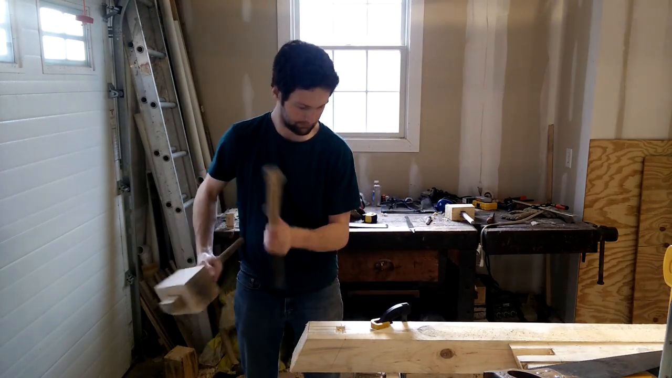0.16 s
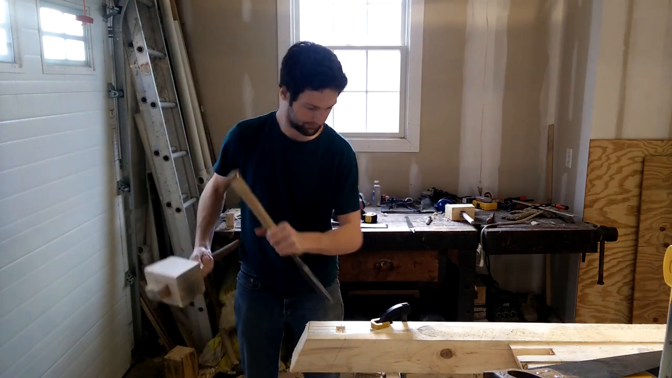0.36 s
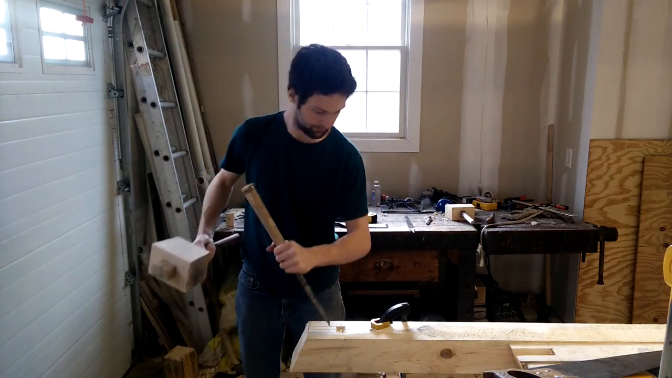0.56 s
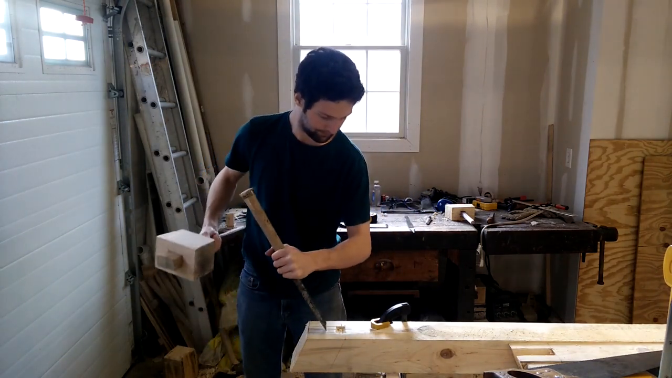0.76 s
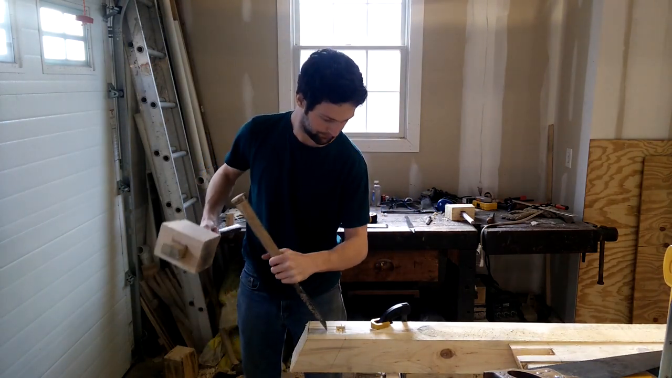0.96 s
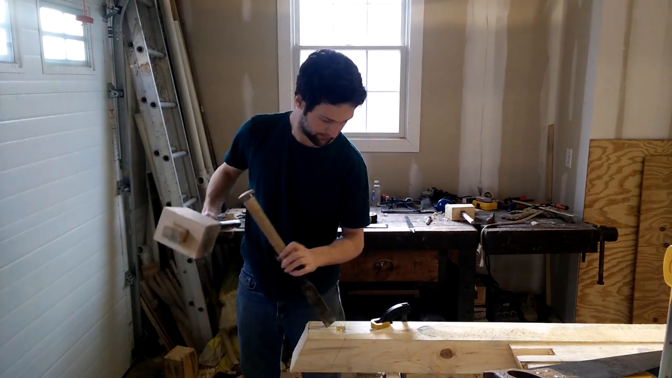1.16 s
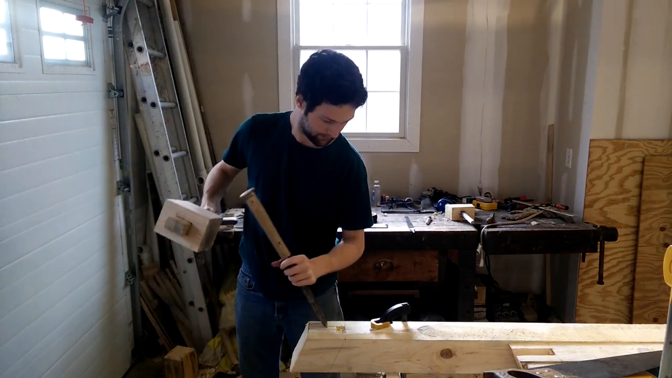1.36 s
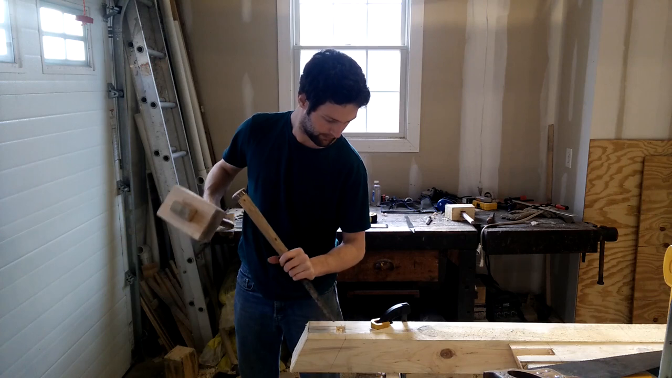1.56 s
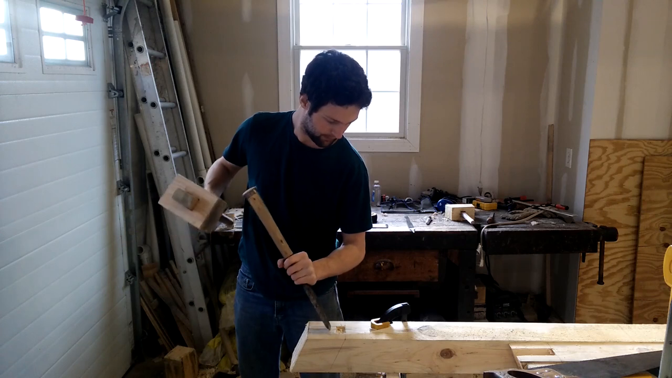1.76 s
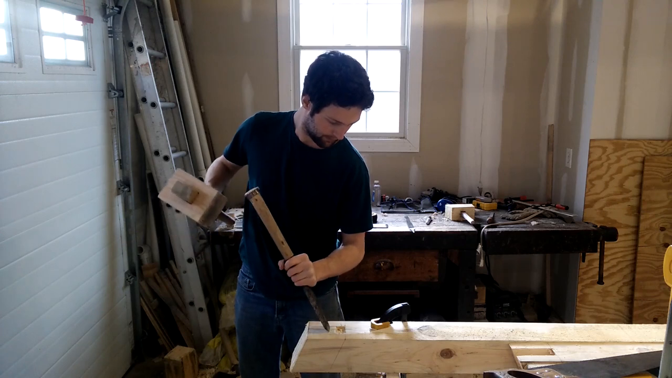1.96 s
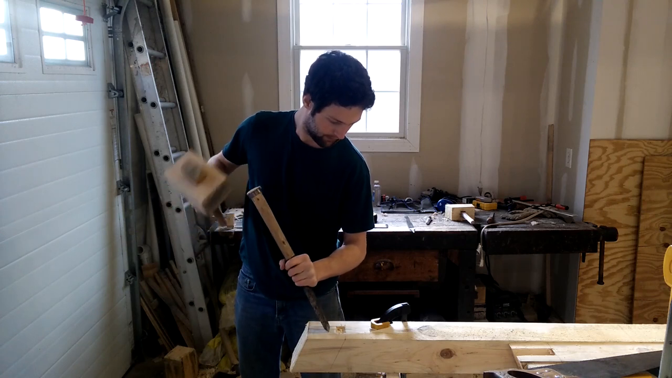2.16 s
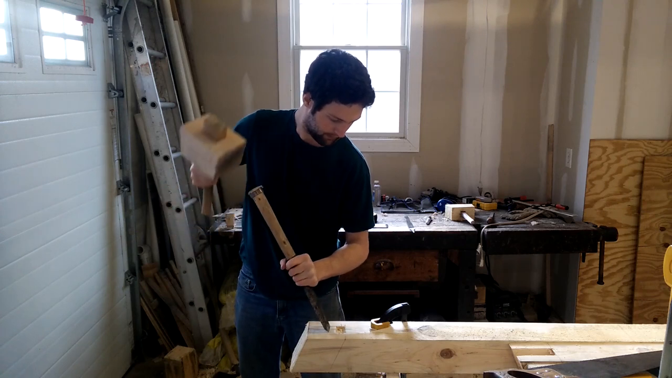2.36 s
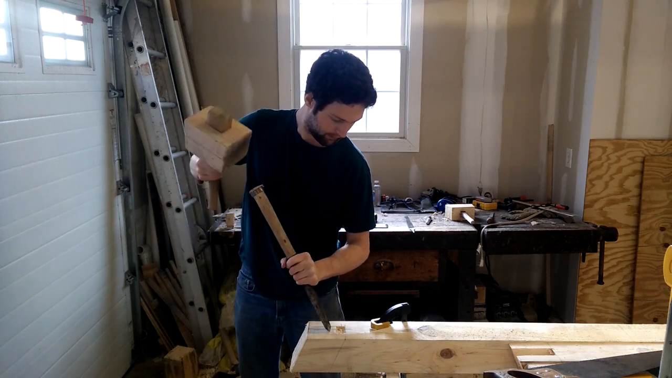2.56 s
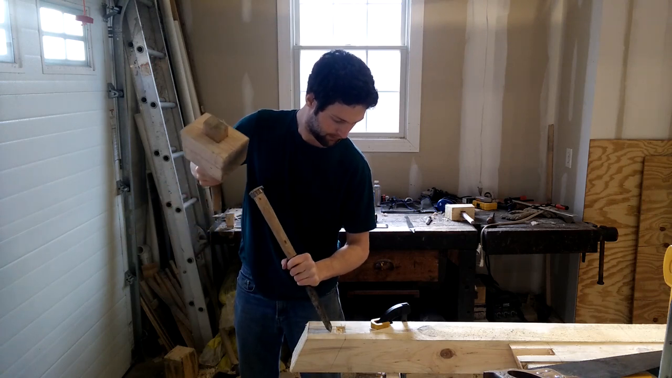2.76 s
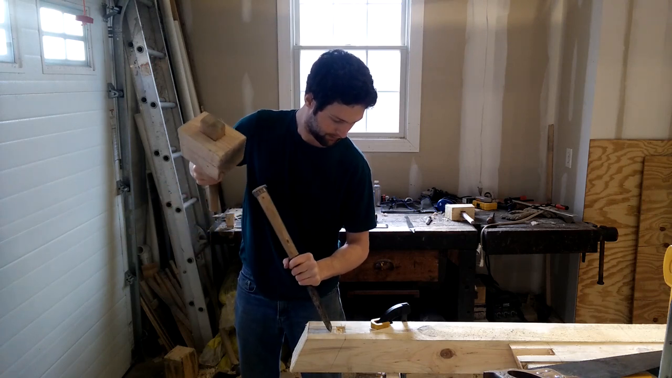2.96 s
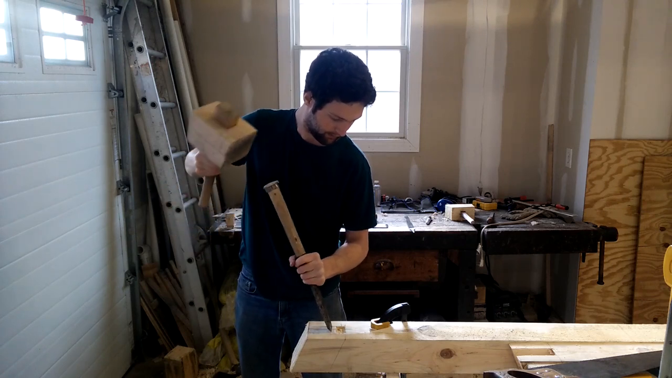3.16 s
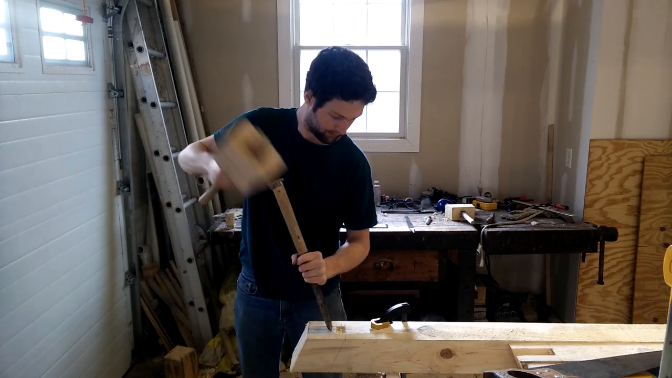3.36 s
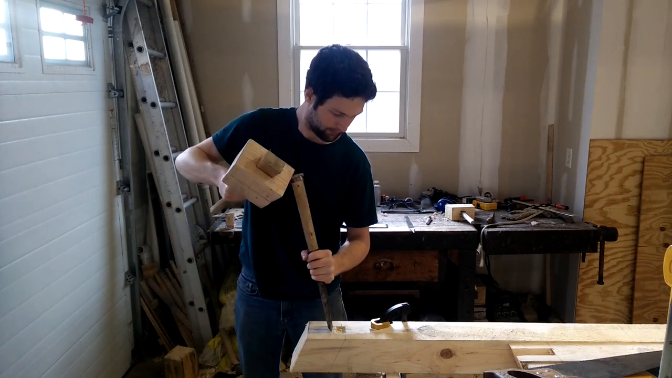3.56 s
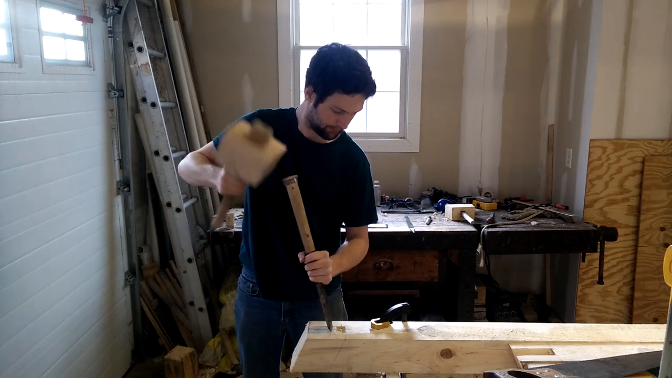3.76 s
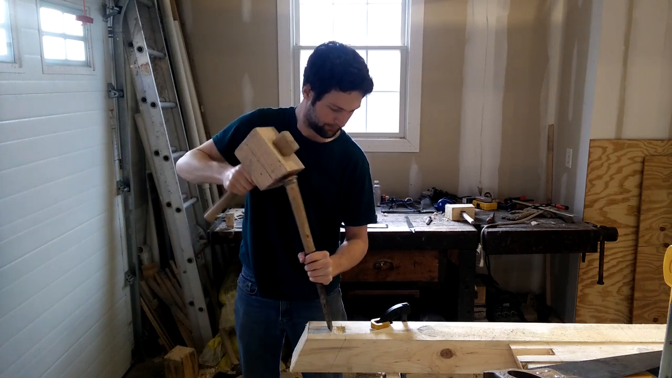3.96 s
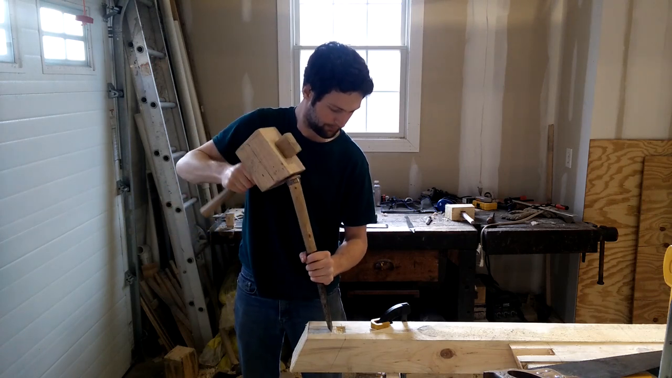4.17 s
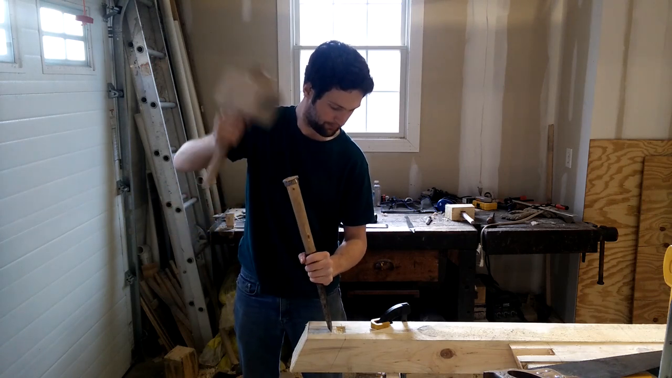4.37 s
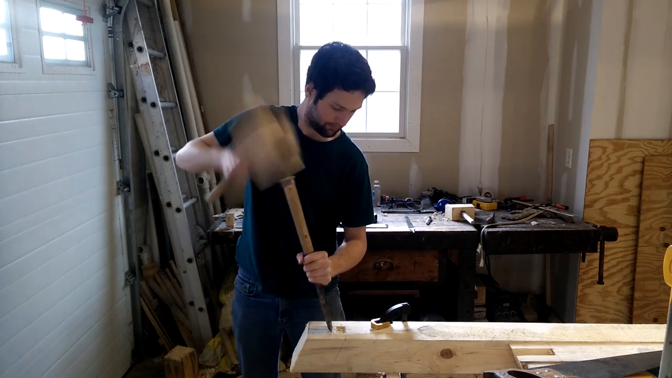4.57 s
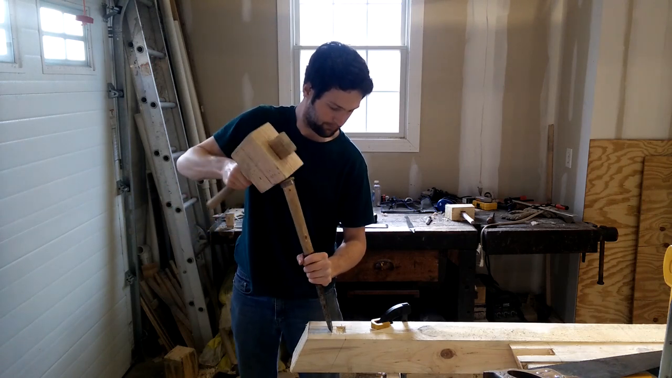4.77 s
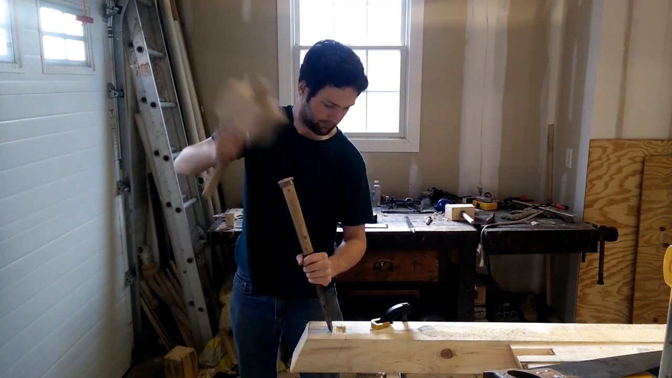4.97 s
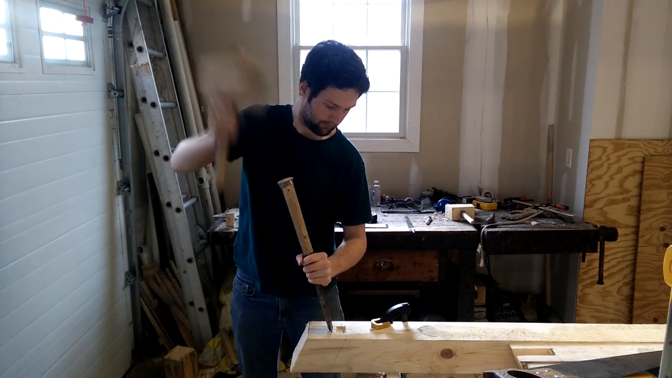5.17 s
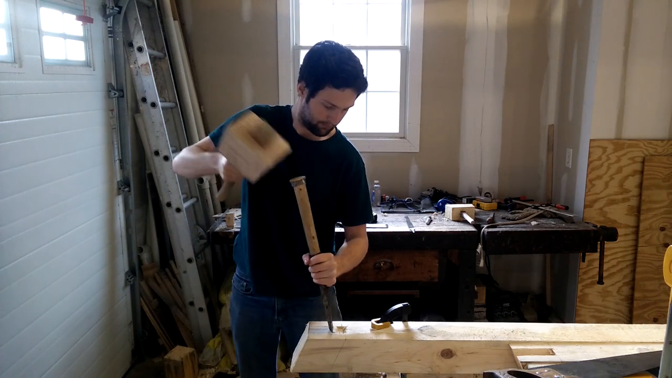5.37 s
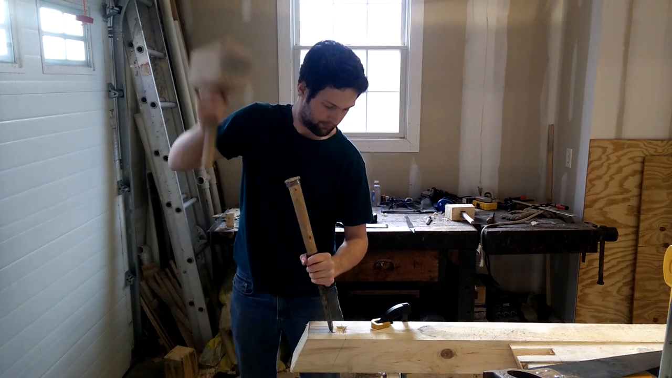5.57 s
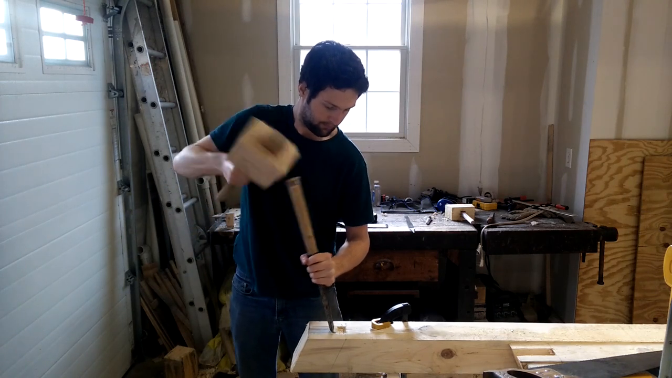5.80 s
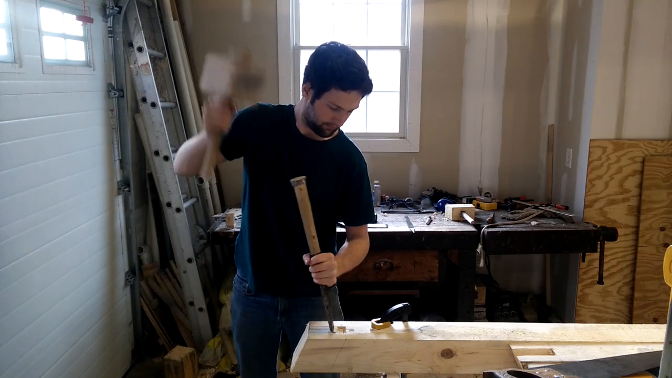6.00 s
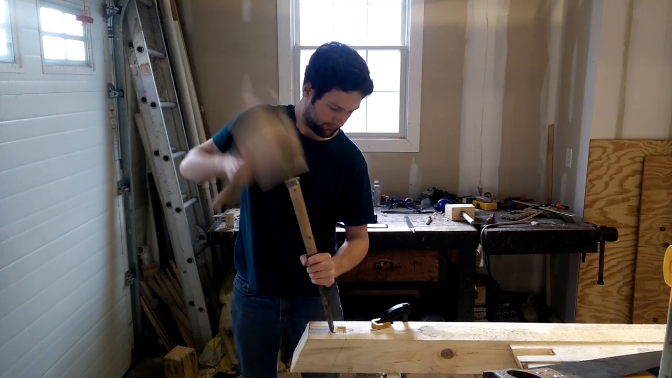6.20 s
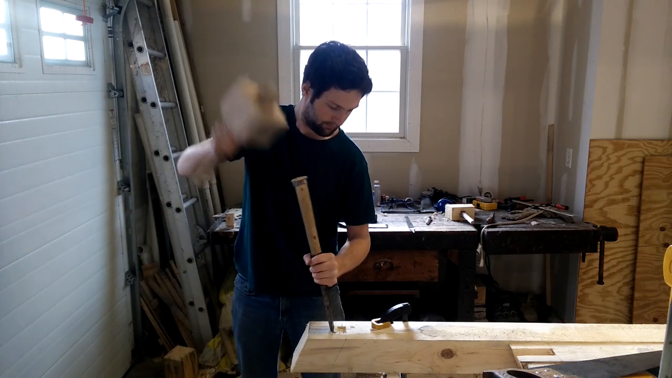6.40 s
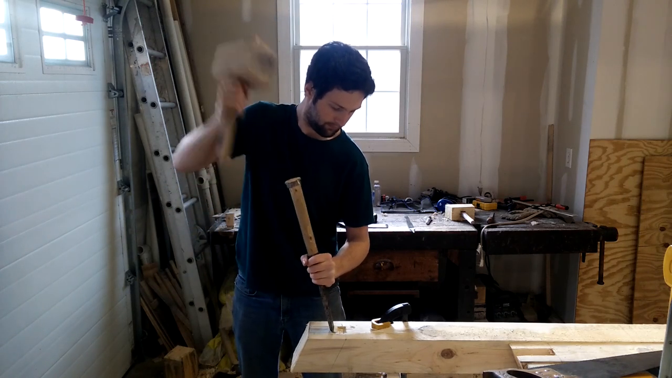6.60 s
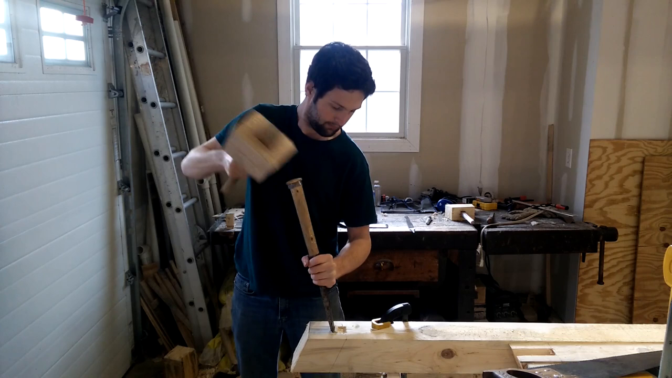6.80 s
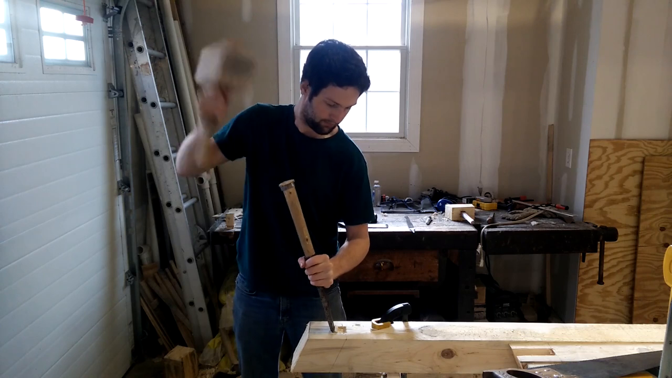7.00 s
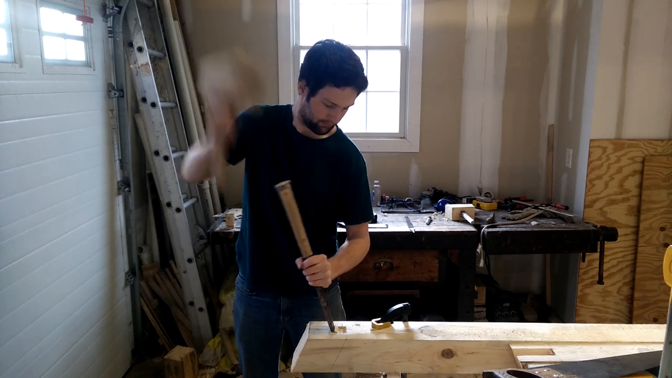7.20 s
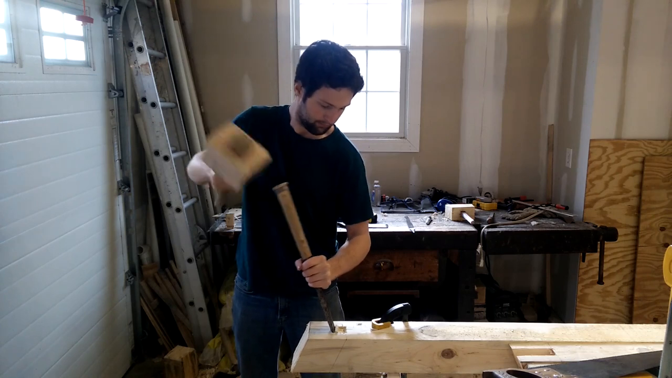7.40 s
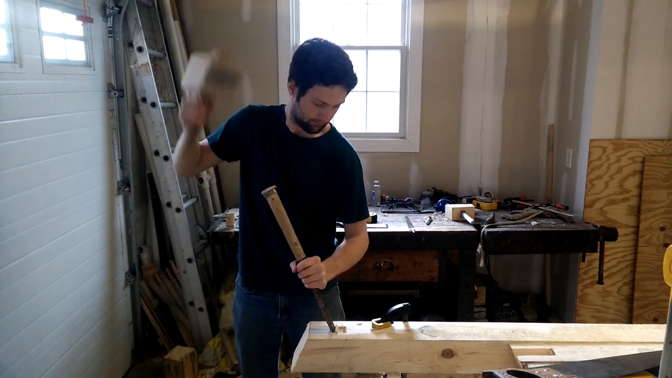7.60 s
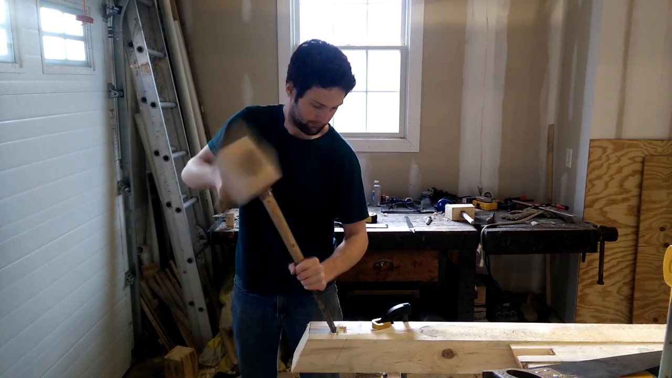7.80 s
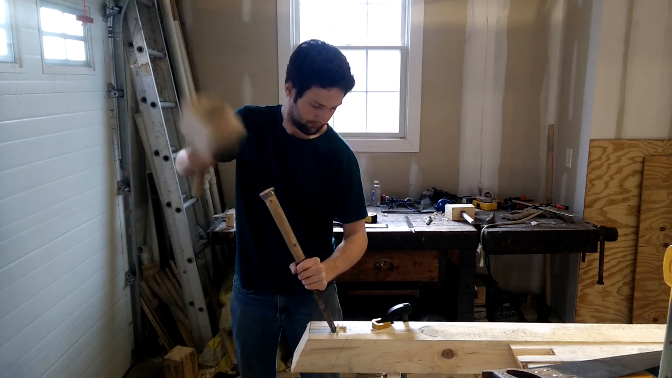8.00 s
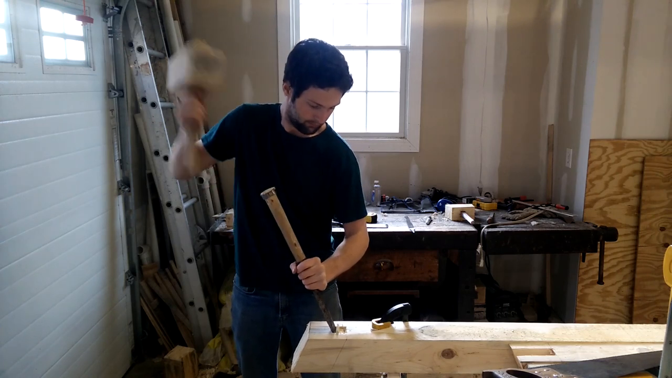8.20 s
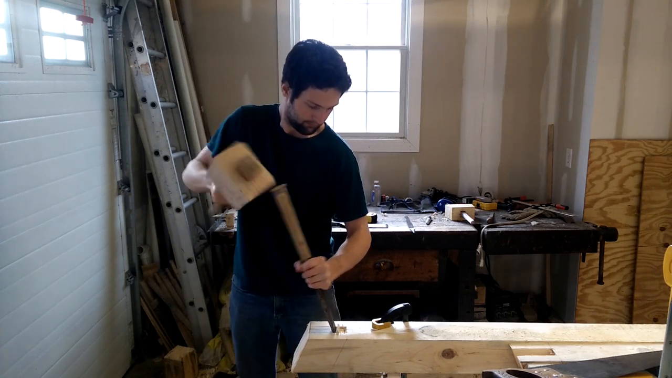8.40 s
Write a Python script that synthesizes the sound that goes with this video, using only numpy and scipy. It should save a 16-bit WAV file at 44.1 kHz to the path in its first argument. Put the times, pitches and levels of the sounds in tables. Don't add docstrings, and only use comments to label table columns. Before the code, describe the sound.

Soft wooden knocks, ticks and gritty scrapes of a chisel on timber, then two light mallet taps and eight hard, overloaded blows ringing the room.

```python
import sys
import numpy as np
from scipy import signal
from scipy.fft import rfft, irfft
from scipy.io import wavfile

SR = 44100
rng = np.random.default_rng(int(sys.argv[2]) if len(sys.argv) > 2 else 0)


def invert_db(x):
    u = np.asarray(x, float) / 20
    return 10 ** u


def bounce(signal):
    frames = np.transpose(np.atleast_2d(signal))
    limited = np.clip(frames, -1, 1)
    pcm = np.round(limited * 32767).astype(np.int16)
    wavfile.write(sys.argv[1], SR, pcm)


N = 372644
HZ = np.maximum(np.arange(N // 2 + 1) * SR / N, 1)
BANDS = 40 * 2 ** np.arange(0, 8.8, .5)
KNOCK_HZ = np.arange(2049) * SR / 4096 + 1
LEAD_S = 0.00056


def over_hz(table, hz, column=1):
    table = np.array(table, float)
    return np.interp(np.log(hz), np.log(table[:, 0]), table[:, column])


def set_rms(x, db):
    return x * invert_db(db) / np.sqrt(np.mean(x ** 2))


def high_pass(x, hz):
    return signal.sosfilt(signal.butter(2, hz, "high", fs=SR, output="sos"), x)


def band(x, hz):
    edges = [hz / 2 ** .25, hz * 2 ** .25]
    return signal.sosfilt(signal.butter(2, edges, "band", fs=SR, output="sos"), x)


def add(track, s, x, db):
    start = int((s - LEAD_S) * SR)
    x = x[:N - start]
    track[start:start + len(x)] += x * invert_db(db) / np.abs(x).max()


def ring(modes, seconds):
    t = np.arange(int(seconds * SR)) / SR
    hz, db, t60 = np.transpose(modes)[:, :, None]
    return np.sum(invert_db(db - 60 * t / t60) * np.sin(2 * np.pi * hz * t), axis=0)


def ports(hz, size):
    alike_below_hz, steepness = 720, 3.7
    alike = 1 / (1 + (hz / alike_below_hz) ** steepness)
    mid, side = band(rng.standard_normal((2, size)), hz)
    return np.sqrt(1 + alike) * mid + np.sqrt(1 - alike) * side * np.array([[1], [-1]])


# (frequency [Hz], level [dB per Hz])
FLOOR_COLOUR = [(25, -32), (48, -2.5), (76, -10), (220, -11), (500, -25), (1000, -34.5), (5500, -51),
                (14000, -76)]
# (frequency [Hz], left minus right [dB])
FLOOR_BALANCE = [(60, -3.5), (200, -1.5), (1290, -5.5), (15000, -7)]
# (frequency [Hz], width [octaves], level [dB])
PORT_HUMPS = [(1850, 0.22, 4.5), (6760, 0.22, 10)]


def rumble():
    floor_db, wander_db = -42, 1.5
    noise, knots = 0, np.linspace(0, N, 60)
    for hz in BANDS:
        walk_db = wander_db * np.interp(np.arange(N), knots, rng.standard_normal(len(knots)))
        balance_db = over_hz(FLOOR_BALANCE, hz) * np.array([[.5], [-.5]])
        noise = noise + invert_db(walk_db + balance_db) * ports(hz, N)
    humps_db = sum(db * np.exp(-(np.log2(HZ / hz) / width) ** 2) for hz, width, db in PORT_HUMPS)
    colour = invert_db(over_hz(FLOOR_COLOUR, HZ) + humps_db)
    return set_rms(irfft(rfft(noise) * colour, N), floor_db)


# (frequency [Hz], time to fall 60 dB [s], level [dB])
ROOM = [(40, .3, -30), (89, 0.86, 9), (180, 0.41, 6.5), (280, 0.87, 15), (485, 0.84, 18.5),
        (1304, 0.85, 11.5), (2040, 0.93, 2), (8550, 0.56, -5)]


def shade(hz):
    from_hz, db_per_octave, most_db = 369, 6, 27
    left_db = -np.clip(db_per_octave * np.log2(hz / from_hz), 0, most_db)
    return invert_db(over_hz(ROOM, hz, column=2) + left_db * np.array([[.5], [-.5]]))


def diffuse():
    build_s = 0.00067
    t = np.arange(SR) / SR
    tail = sum(shade(hz) * invert_db(-60 * t / over_hz(ROOM, hz)) * ports(hz, SR) for hz in BANDS)
    tail = tail * (1 - np.exp(-t / build_s))
    return tail / np.sqrt(np.mean(np.sum(tail ** 2, axis=1)))


def straight():
    direct_db = -8.5
    return invert_db(direct_db) * sum(shade(hz) * band(signal.unit_impulse(SR), hz) for hz in BANDS)


# (frequency [Hz], level [dB], time to fall 60 dB [s])
RINGING_TONES = [(93.3, 11.5, 0.53), (123, 16, 0.31), (150, 0, 0.82), (179.2, 10.5, 0.23), (245, 5, 0.8),
                 (253, -15.5, 1), (334, -6, 1), (363.5, -17.5, 0.12), (389, 0.5, 0.39), (488, 2.5, 0.57),
                 (528, 3, 0.41), (605, -21, 0.48), (761, 13.5, 0.87), (853, -27.5, 0.23)]


def ringing_tones():
    modes_db = -60
    return invert_db(modes_db) * ring(RINGING_TONES, 1)


def heard(x, response):
    return signal.fftconvolve(x[None], response, axes=1)[:, :N]


# (frequency [Hz], peak level [dB], time to fall 60 dB [s], swell [s])
DOOR = (52, -20.5, .9, .14)


def door():
    hz, peak_db, t60, swell_s = DOOR
    track, t = np.zeros(N), np.arange(SR) / SR
    hum = ring([(hz, 0, t60), (hz - 5, -9, t60)], 1)
    hum = hum * (1 - np.exp(-(t / swell_s) ** 2))
    for s, blow_db, *_ in BLOWS:
        add(track, s, hum, peak_db + .45 * (blow_db - 20))
    return track


def body(modes, gain_db=0):
    scatter_db = 1.8
    hz, db, t60 = np.transpose(modes)[:, :, None]
    peak = invert_db(db + gain_db + scatter_db * rng.standard_normal(hz.shape)) ** 2
    detune = (KNOCK_HZ ** 2 - hz ** 2) / KNOCK_HZ * t60 * np.pi / np.log(1000)
    return np.sum(peak / (1 + detune ** 2), axis=0)


# (frequency [Hz], level [dB])
SLAP = [(100, -31), (1000, 1.5), (2000, -3.5), (3000, 0.5), (4500, 0.5), (6500, -2), (10000, -36.5),
        (16000, -38)]


def slap(db):
    return invert_db(over_hz(SLAP, KNOCK_HZ) + db) ** 2


def knock(power, contact_ms):
    power = power / (1 + (KNOCK_HZ * contact_ms / 1000) ** 2) ** 2
    cepstrum = irfft(np.log(power + 1e-18) / 2)
    cepstrum[1:2048] *= 2
    cepstrum[2049:] = 0
    return irfft(np.exp(rfft(cepstrum)))


def shiver(x, decay_s, attack_s):
    t = np.arange(8192) / SR
    contacts = rng.standard_normal(size=8192) * (1 - np.exp(-t / attack_s)) * np.exp(-t / decay_s)
    return signal.fftconvolve(x, contacts)


def strokes(rows):
    attack_s, release_s = 0.011, 0.017
    pressure, t = np.zeros(N), np.arange(SR // 2) / SR
    for s, db, hold_s in rows:
        let_go = np.exp(-np.maximum(t - hold_s, 0) / release_s)
        add(pressure, s, np.clip(t / attack_s, 0, 1) * let_go, db)
    return pressure


# (time [s], level [dB], length [s])
RUSTLES = [
    (0.002, -61, .05),
    (.15, -66, 0.1),
]
# (time [s], level [dB], length [s])
SCRAPES = [(1.9, -66.5, 0.1), (1.995, -59, 0.033), (2.04, -57.5, .045), (2.16, -61, 0.039),
           (2.222, -51, 0.0082), (2.292, -50.5, 0.011), (2.33, -57.5, 0.15), (2.512, -44, 0.021),
           (2.55, -50.5, 0.0061), (2.58, -60, 0.067), (3.06, -68.5, 0.074), (3.26, -64.5, 0.13),
           (.755, -58, 0.0083), (3.92, -52, 0.011), (4.36, -62.5, 0.31)]
# (frequency [Hz], level [dB per Hz])
SCRAPE_COLOUR = [(300, 4), (600, -5.5), (1000, -11), (1800, -2.5), (3000, -8), (5500, -8.5), (8000, -23),
                 (11000, -51)]


def drags():
    grit = rng.standard_normal(N) * invert_db(3 * rng.exponential(size=N))
    grit = set_rms(irfft(rfft(grit) * invert_db(over_hz(SCRAPE_COLOUR, HZ)), N), 5.6)
    cloth = high_pass(grit, 3200)
    return grit * strokes(SCRAPES) + cloth * strokes(RUSTLES)


# (time [s], peak level [dB], pitch [Hz], rub [ms])
TICKS = [(2.008, -62, 1910, 3.6), (2.198, -50, 2070, 7.3), (2.228, -38.5, 1850, 13), (2.295, -49, 2160, 4),
         (2.437, -42, 2180, 6.1), (2.555, -39, 1900, 2.6), (3.29, -48, 1794, 5.5), (3.328, -50, 1850, 44),
         (3.904, -28.5, 1990, 20), (3.923, -18.5, 2000, 20), (4.47, -50, 2100, 42),
         (4.502, -43.5, 2000, 4.9)]
# (time [s], peak level [dB], pitch [Hz], rub [ms])
EDGE_TICKS = [
    (0.759, -53, 4400, 5),
    (1.1715, -57, 5600, 3),
    (2.226, -43, 5030, 12),
    (2.524, -40, 4340, 14),
    (2.546, -40, 4200, 3),
    (2.555, -36, 4270, 1.6),
    (2.812, -47, 4500, 7),
    (3.112, -41, 4500, 24),
]


def ticks():
    handle_ring_s, edge_ring_s = .022, 0.0079
    contact_ms, slap_db, rub_attack_s = 0.18, -29, .0015
    track = np.zeros(N)
    for rows, ring_s in ((TICKS, handle_ring_s), (EDGE_TICKS, edge_ring_s)):
        for s, db, hz, rub_ms in rows:
            tick = knock(body([(hz, 0, ring_s)]) + slap(slap_db), contact_ms)
            add(track, s, shiver(tick, rub_ms / 2000, rub_attack_s), db + 1.5)
    return track


# (time [s], peak level [dB], pitch [Hz], contact [ms])
KNOCKS = [
    (0.768, -19.5, 243, 7),
    (1.215, -49, 180, 1),
    (1.53, -49, 164, 1.4),
    (1.998, -14, 243, 7.3),
    (2.066, -36, 147, 5),
    (2.559, -15, 352, 0.7),
    (2.869, -26.5, 225, 2.3),
]


def set_down():
    track = np.zeros(N)
    for s, db, hz, contact_ms in KNOCKS:
        power = body([(hz, 6, .08)] + BEAM) + slap(-4.5)
        add(track, s, knock(power, contact_ms), db - 7.0)
    return track


# (frequency [Hz], peak level [dB], time to fall 60 dB [s])
BEAM = [(56.4, -13.5, 0.11), (83.8, -2, 0.36), (106.6, -2, 0.12), (178, 2, 0.095), (237.7, 2.5, 0.075),
        (272, -1, 0.052), (379, -2, 0.029), (524, -5.5, 0.045), (638.6, -3, 0.032), (732, -3.5, 0.075)]
# (frequency [Hz], level [dB], time to fall 60 dB [s])
MALLET_HEAD = [(912, -8, 0.028), (1068, -10.5, 0.09), (1232, -7, 0.01), (1486, -6, 0.051)]
# (frequency [Hz], level [dB], time to fall 60 dB [s])
STEEL = [(3150, 0, .012), (3380, -3, .01), (4500, -10, .008)]
# (time [s], strength [dB], trestle boom [dB], head ring [dB], steel ring [dB])
BLOWS = [
    (3.464, 11, 7, -2, -26),
    (4.02, 9.5, 7, -35, -23),
    (4.663, 22, 3.5, -1, -31.5),
    (5.323, 22.5, 1.5, 0, -9),
    (5.845, 23, 1, -1.5, -18),
    (6.303, 24, 0, 0.5, -26),
    (6.791, 24, -1, 1, -36.5),
    (7.325, 21.5, 1.5, 1.5, -6),
    (7.857, 21.5, -1, -1, -2.5),
    (8.368, 26, 3.5, 1.5, -26),
]


def mallet():
    full_blow_db, contact_ms = 22, 0.13
    longer_db_per_db = 0.76
    slap_db, tap_slap_db_per_db = -19, 0.63
    boom_modes = 6
    swell_s = .035
    track = np.zeros(N)
    for s, blow_db, boom_db, head_db, steel_db in BLOWS:
        softer_db = full_blow_db - blow_db
        beam = body(BEAM[:boom_modes], boom_db) + body(BEAM[boom_modes:])
        power = beam + body(MALLET_HEAD, head_db) + slap(slap_db + tap_slap_db_per_db * softer_db)
        add(track, s, knock(power, contact_ms * invert_db(longer_db_per_db * softer_db)), blow_db)
        steel = shiver(knock(body(STEEL), contact_ms), swell_s, swell_s)
        add(track, s, steel, blow_db + steel_db - 25.5)
    return track


def scene():
    near_db, left_lag, shift_rad = 8, 12, .8
    background = door() + rumble()
    direct, ringing = straight(), ringing_tones()
    tail, other_tail = diffuse(), diffuse()

    small = ticks() + drags()
    handling = heard(set_down() + small, invert_db(-3) * direct + ringing + tail)
    close = heard(small, invert_db(near_db) * direct[:, :8192])

    blows = mallet()
    blow_number = np.searchsorted(np.array(BLOWS)[:, 0] - .01, np.arange(N) / SR)
    turn = shift_rad * rng.standard_normal(len(BLOWS) + 1)[blow_number]
    loud = heard(blows, direct + ringing)
    loud = loud + heard(blows * np.cos(turn), tail) + heard(blows * np.sin(turn), other_tail)

    left, right = loud + handling + close + background
    return np.array([np.pad(left, (left_lag, 0))[:N], right])


def squash(x, knee):
    return x / (1 + np.abs(x) ** knee) ** (1 / knee)


def low_pass(x):
    return signal.sosfilt(signal.butter(12, 15900, fs=SR, output="sos"), x)


def record(dry):
    headroom, ride, knee = .96, .14, 45
    left_db, left_top_hz, right_top_hz = -1.5, 6500, 17000
    dry = high_pass(dry, 38)
    treble = high_pass(dry, 2500)
    flat = headroom * squash(dry, knee) + ride * np.tanh(treble)
    flat = high_pass(flat, 30)
    left = signal.lfilter(*signal.butter(1, left_top_hz, fs=SR), invert_db(left_db) * flat[0])
    right = signal.lfilter(*signal.butter(1, right_top_hz, fs=SR), flat[1])
    return low_pass(np.clip([left, right], -1, 1))


dry = scene()
out = record(dry)
bounce(out)
```